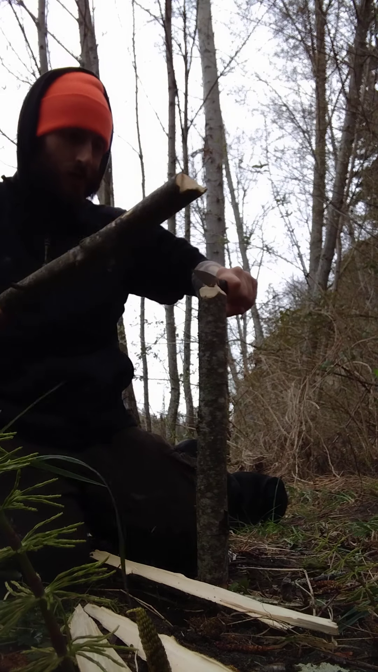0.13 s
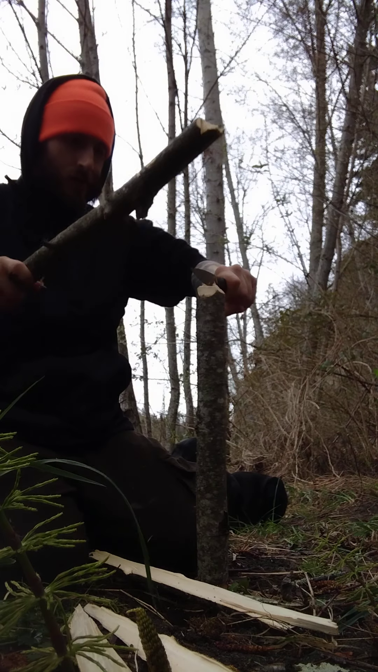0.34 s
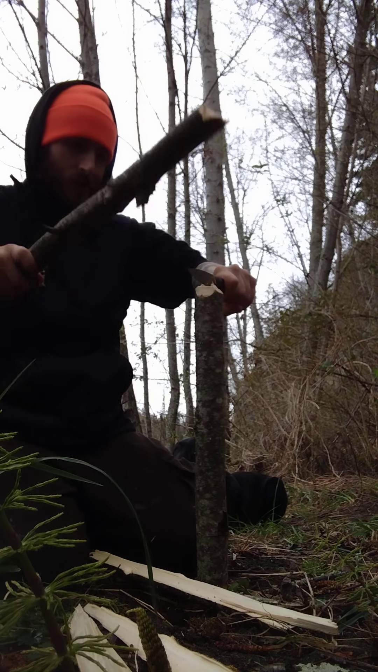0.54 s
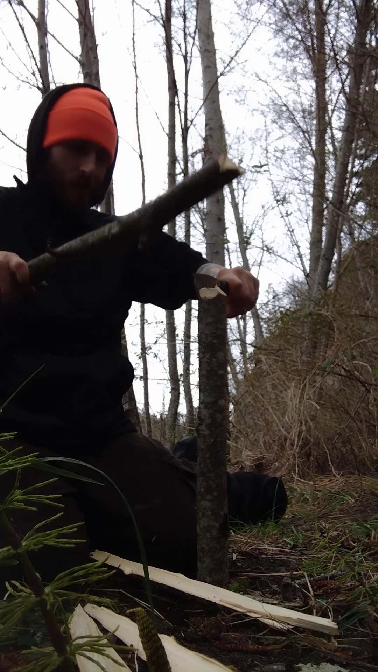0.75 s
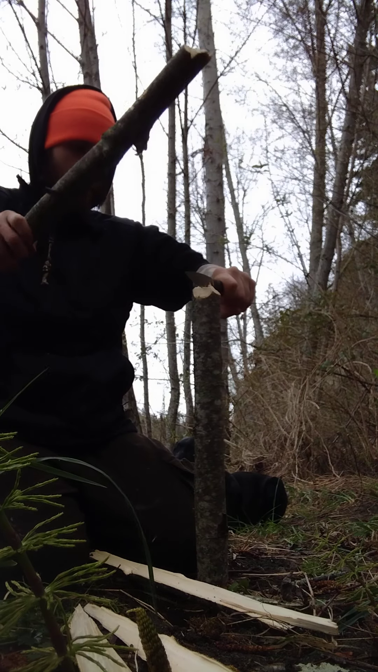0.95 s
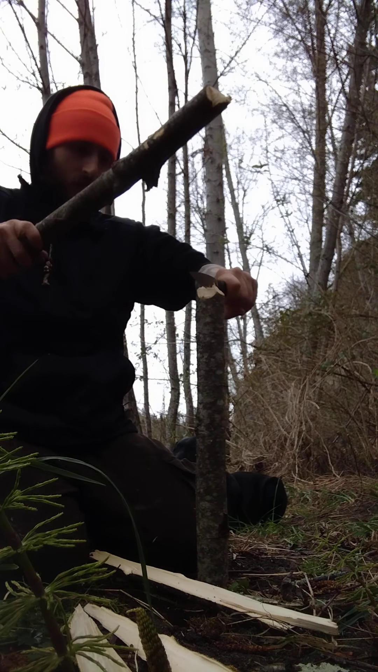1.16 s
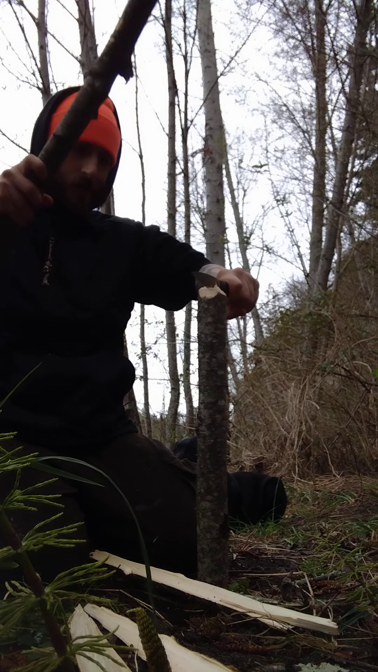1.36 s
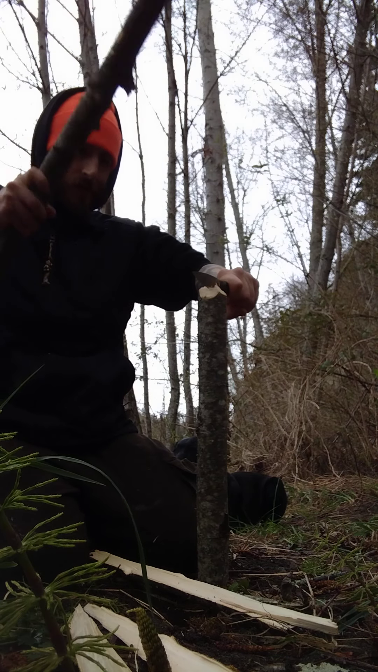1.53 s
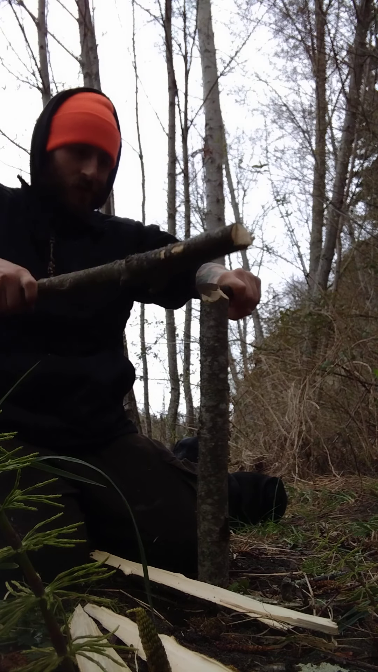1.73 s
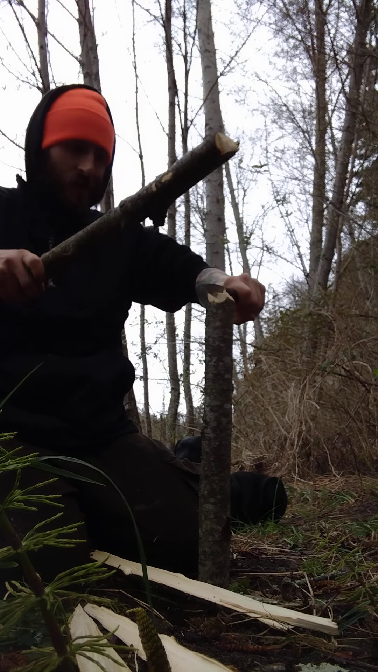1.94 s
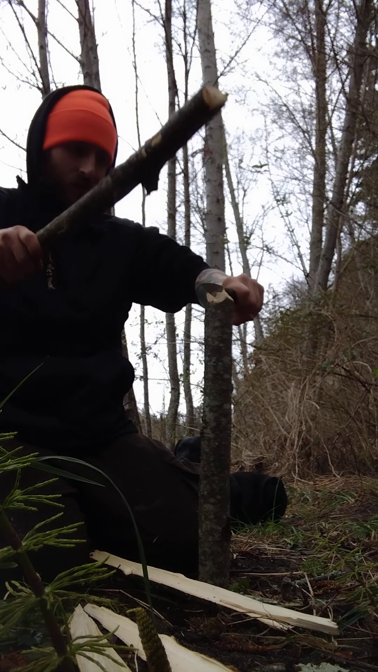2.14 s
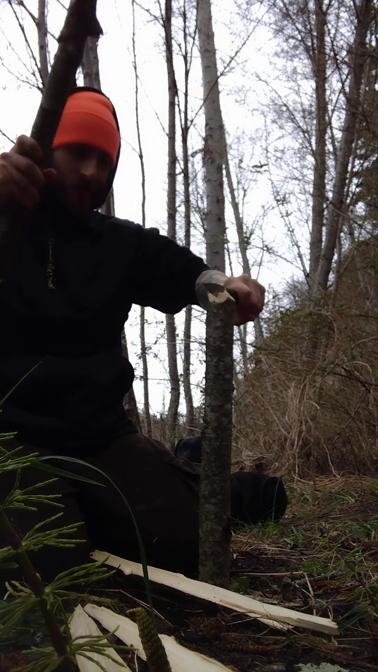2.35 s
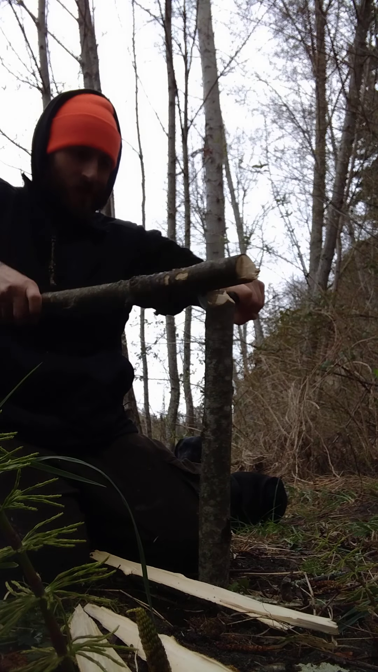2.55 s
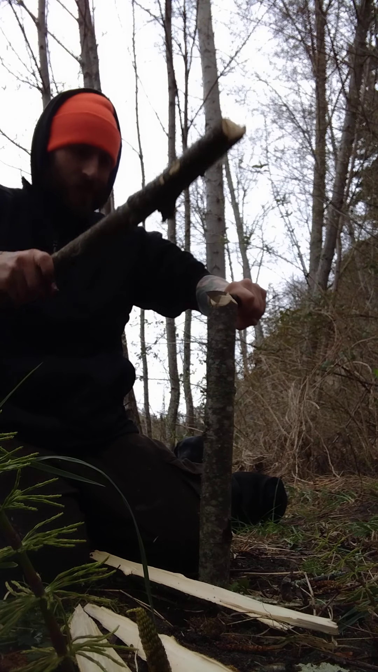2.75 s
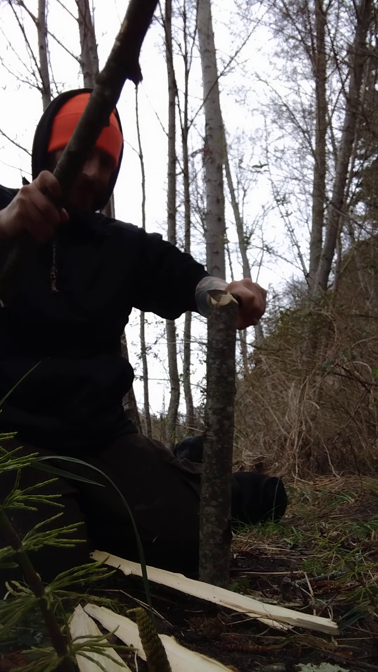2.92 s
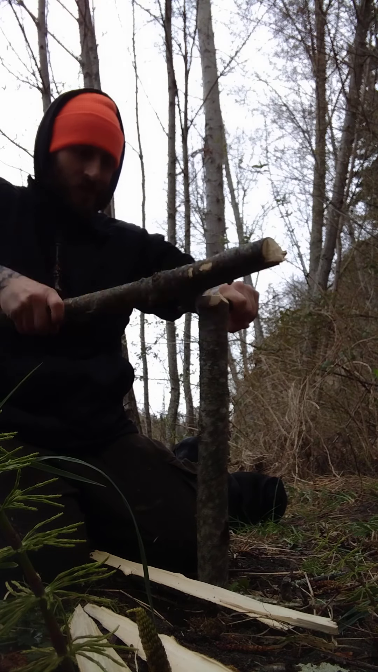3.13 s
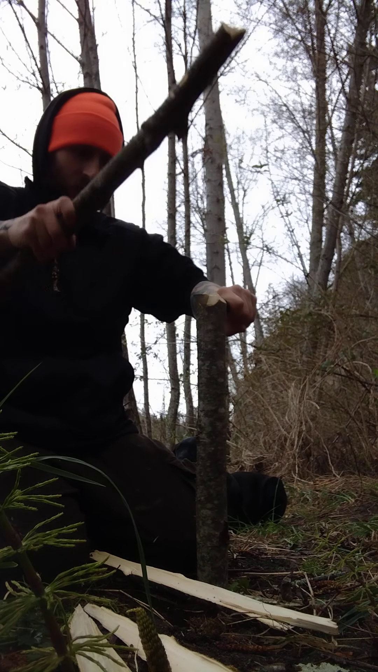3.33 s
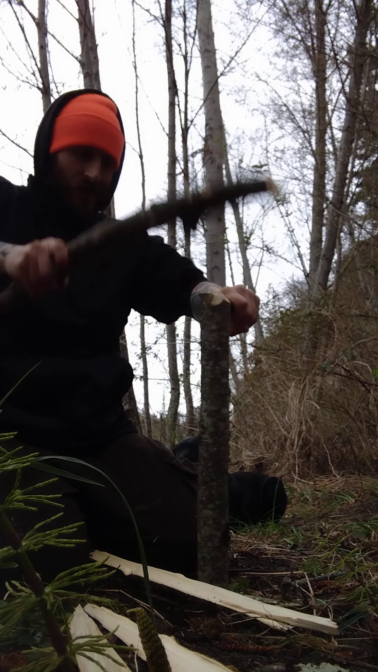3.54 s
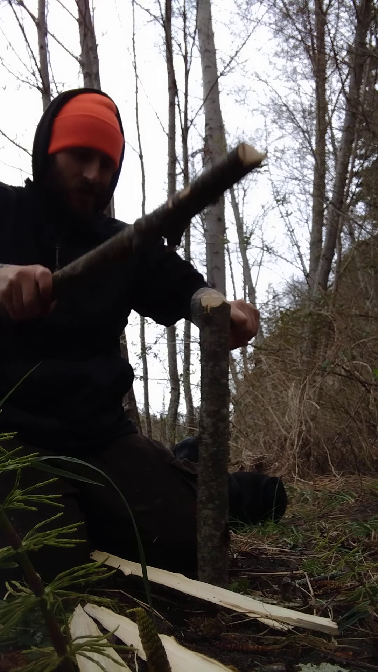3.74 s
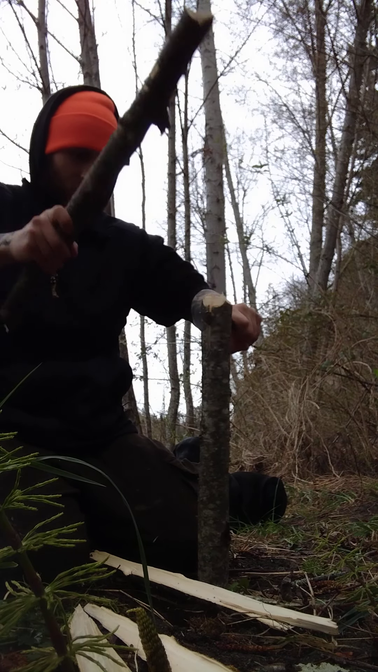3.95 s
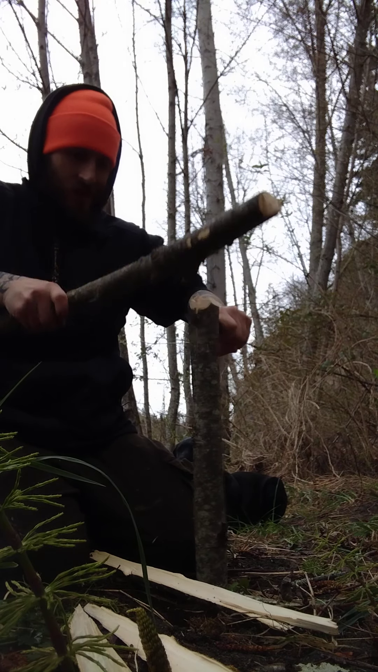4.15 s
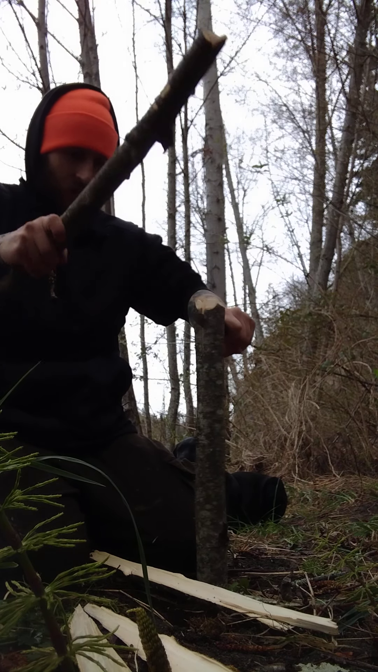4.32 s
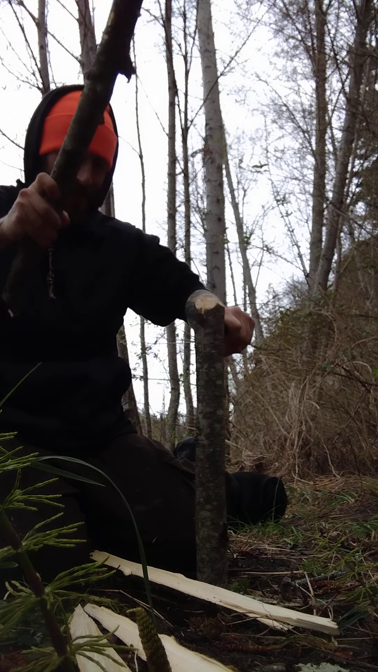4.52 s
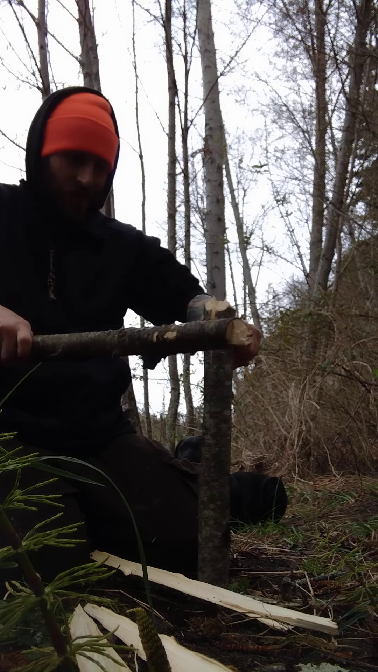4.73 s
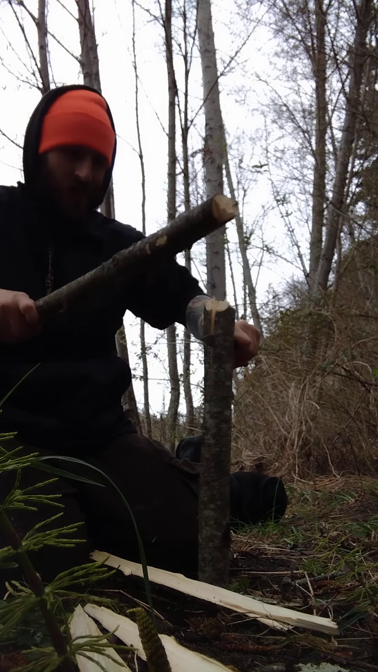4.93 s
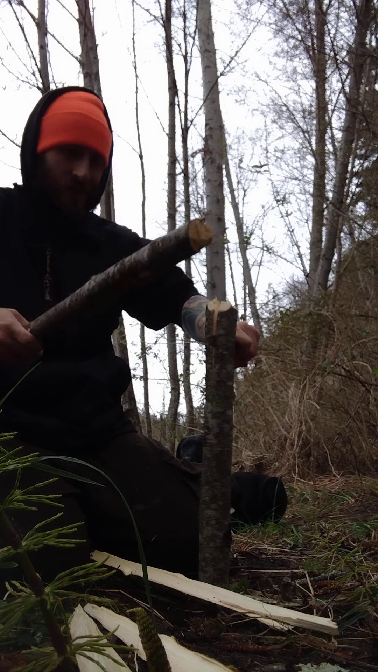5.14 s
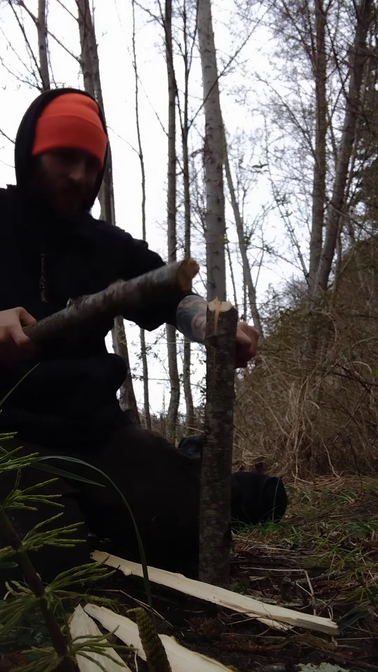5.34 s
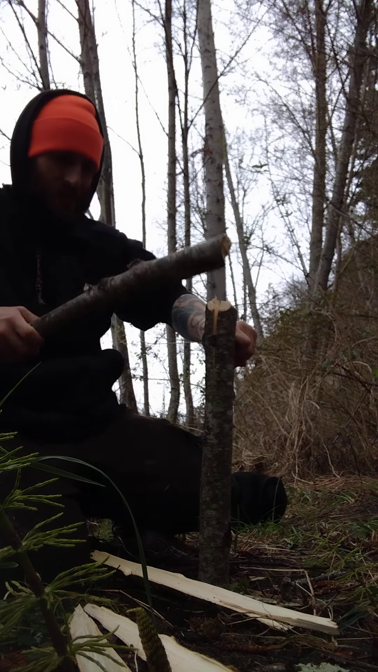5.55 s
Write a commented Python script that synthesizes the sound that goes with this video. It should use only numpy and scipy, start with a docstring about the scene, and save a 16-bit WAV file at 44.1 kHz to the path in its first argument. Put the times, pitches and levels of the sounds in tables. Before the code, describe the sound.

A low, dull rush of river water and wind runs steadily for about five and a half seconds, gently churning and much quieter than the blows. At 0.1 s a faint sleeve rustle and tiny tap are heard, and at 0.75 s another light woody tap. Then a wooden baton hits a knife blade wedged in an upright stick six times, at about 1.7, 2.6, 3.2, 3.7, 4.1 and 4.8 s. Each blow is very short and dry: a bright crack, a choked steel ring, a woody knock, a soft deep thud into soil and a crisp tearing of fibres. The second is sharpest and most metallic, with a small rebound click; the third is duller; the fifth is hollow, full and thumpy; the last tears longest. Small grip rustles surround some blows. Brief undergrowth reflections and a faint longer tree echo follow each. Close stereo microphone, open woodland. Only the rush and a barely audible rustle near 5.3 s remain.

```python
"""A steady rush of water and wind comes first, then a soft rustle and light taps, then six hard knocks.
A wooden baton strikes the spine of a knife set in an upright stick, in a wood beside a river.
Each blow rings the wedged blade, knocks the stick, thuds into the soil and tears a few fibres.
Dying sine waves make the rings and thuds, tiny random snaps make the cracks, tearing and rustles.
Fading noise makes the echoes of undergrowth and trees; noise shaped in pitch and time makes the rush."""
import sys
import numpy as np
from scipy import signal
from scipy.fft import rfft, irfft
from scipy.io import wavfile
from scipy.ndimage import uniform_filter1d

SR = 44100
rng = np.random.default_rng(int(sys.argv[2]) if len(sys.argv) > 2 else 0)


def digitize_waveform(pressure):
    """Quantize a signal to 16-bit integers and store it at the path in sys.argv[1].

    Rows of a 2-D input are taken as channels; values are limited to [-1, 1].
    """
    field = np.atleast_2d(pressure).T
    bounded = np.clip(field, -1, 1)
    quanta = np.round(bounded * 32767).astype(np.int16)
    wavfile.write(sys.argv[1], SR, quanta)


N = 246078  # length of the scene in samples
T = np.arange(int(.35 * SR)) / SR  # time within one struck sound, seconds

# Baton blows: start_s, crack_db, steel_db, stick_knock_db, hollow_clonk_db, soil_thud_db,
# blade_slide_s, tearing_db, main_bend_hz, main_bend_db, upper_bend_hz
BATON_BLOWS = [(1.7363, -17.5, -24.5, -18, -28, -36.5, 0.0059, -31, 2125, -20.5, 3490),
               (2.6486, -10, -18.5, -17.5, -51, -28, 0.0039, -26, 2290, -4, 2700),
               (3.2269, -28.5, -41, -16.5, -30, -36, .005, -22, 1970, -18.5, 2800),
               (3.6797, -20.5, -18, -23.5, -35, -39, 0.0092, -25.5, 2210, -21.5, 2740),
               (4.1384, -23, -31.5, -13, -10, -25.5, .0033, -37, 1660, -15.5, 2290),
               (4.7666, -16, -22.5, -22, -27, -41, .014, -26, 2060, -17.5, 3175)]
# Light touches and rebounds of baton and knife: start_s, tick_db, steel_db, stick_knock_db, # soil_thud_db,
# tone_hz, tone_db (a short swelling tone: a bend of the blade, but at 2.6093 s the stick's hollow clonk)
LIGHT_TAPS = [(.1345, -52, -39, -44, -74, 1310, -35), (0.75, -42, -40.5, -32, -50.5, 3600, -46.5),
              (2.6093, -59, -56.5, -54, -69.5, 330, -29.5), (2.6851, -21, -45, -42, -60, 1980, -22),
              (4.1818, -40.5, -42, -49.5, -71.5, 3020, -53)]
# Sleeve and grip rustles: start_s, length_s, level_db
CLOTH_RUSTLES = [(0.113, 0.15, -58.5), (2.587, 0.038, -55), (2.606, 0.01, -48.5), (3.189, 0.021, -49),
                 (4.111, 0.061, -49), (4.175, 0.066, -57), (5.292, 0.056, -62)]

# The next four tables hold ringing tones. A level is relative, since each strike adds its own.
# t60_s is the time to fall by 60 dB; left_lead_rad is how far the left side's phase is ahead.
# Steel blade: pitch_hz, level_db, t60_s, left_minus_right_db, left_lead_rad
BLADE_TONES = [(1317, -10.5, 0.056, -4, -2.1), (1760, -6.5, 0.027, -14, -2), (2018, 3, 0.028, -3, 0.2),
               (2500, 1.5, 0.031, -1, -3), (2766, -0.5, 0.025, -4.5, -0.66), (3280, -16, 0.022, 1, -4),
               (3520, -15, 0.045, 6, 2.8), (4036, -10.5, 0.02, 0, -0.5)]
# Wooden stick: pitch_hz, level_db, t60_s, left_minus_right_db, left_lead_rad
STICK_TONES = [(625, -5.5, 0.014, 9, 0.3), (747, -2.5, 0.025, 5, 0.14), (977, -3, 0.011, 2.5, -4),
               (1330, -8.5, 0.0267, -10, -2.2), (1530, -15, 0.0082, -2.5, -3)]
# Hollow clonk of the stick: pitch_hz, level_db, t60_s, left_minus_right_db, left_lead_rad
CLONK_TONES = [(172, -16, 0.011, 3.6, .1), (312, 1.5, 0.025, 3, 0.13), (398, 1.5, 0.022, 3, 0.25)]
# Soil, before each blow changes pitch and length: pitch_hz, level_db, t60_s, left_minus_right_db, left_lead_rad
SOIL_TONES = [(55, -6, 0.21, 3, .1), (107.5, 7.5, .14, 4.4, 0.12), (129.4, -3.5, 0.16, 2.6, .1),
              (200, 0.5, 0.095, 3, .1)]

# Tone colours; only the shape counts, as the loudness is set elsewhere.
# Wood snapping against steel: pitch_hz, relative_level_db
CRACK_COLOUR = [(40, -43), (300, -11), (1200, 2), (2200, -2.5), (3500, 2.5), (5200, -8), (7500, -4.5),
                (11000, -12.5), (15500, -5), (17000, -4.5)]
# Tearing wood fibres: pitch_hz, relative_level_db
TEAR_COLOUR = [(40, -44), (300, -9), (1200, -12.5), (2200, 4), (3300, -4.5), (4400, -14.5), (5400, -8.5),
               (7000, -11.5), (11000, -20), (15500, -11), (17000, -11)]
# Rubbing sleeve and grip: pitch_hz, relative_level_db
CLOTH_COLOUR = [(400, -9), (1200, 4.5), (2700, 12), (4500, -7), (8000, -4.5), (11000, -16.5), (15000, -1.5),
                (16500, -16)]
# Water and wind: pitch_hz, relative_level_db
RUSH_COLOUR = [(15, -68), (25, -49), (53, -33), (78, -13), (127, -8), (206, -5), (256, -4), (476, -2.5),
               (560, -1), (1190, -12), (1520, -18.5), (2480, -19.5), (3340, -30), (14800, -51.5),
               (16000, -45)]

# Slow swell of the rush, before RUSH_DB is added: time_s, level_db
RUSH_SWELL = [(0.0, -47), (0.28, -49), (3.26, -46.5), (3.42, -46.5), (5.24, -47.5), (5.58, -49.5)]
# Likeness of left and right in rush and echoes: pitch_hz, likeness (1 same, 0 unrelated, below 0 opposed)
SIDE_LIKENESS = [(60, 0.91), (130, 0.99), (290, 0.99), (640, 1), (1410, 0.34), (3100, 0.15), (6820, -0.087),
                 (15000, -0.25)]
# Left-right balance of the rush: pitch_hz, left_minus_right_db
RUSH_BALANCE = [(60, 2), (110, 1.0), (200, 0.5), (380, 1.5), (700, 2.5), (1290, -0.5), (2380, -4.5),
                (4400, -5), (8120, -3.5), (15000, -1.5)]
# How the two microphones hear the tiny snaps: pitch_hz, left_minus_right_db
SNAP_BALANCE = [(300, 6), (750, -14), (1350, -13), (2000, 9.5), (3400, -3), (5200, -3), (7500, -2),
                (9800, 10.5), (13000, -2.5), (16000, 2.5)]
# Short echoes from undergrowth: pitch_hz, level_db, t60_s
UNDERGROWTH_ECHO = [(250, -18, 0.13), (600, -15, 0.12), (1384, -14, .1), (2100, -21.5, 0.13),
                    (3440, -12, 0.12), (7000, -12.5, 0.13), (15000, -8.5, 0.1)]
# Long echoes from trees: pitch_hz, level_db, t60_s
TREE_ECHO = [(99.5, -36.5, .8), (513, -10, 1.5), (1300, -17, 1.1), (2100, -28, 1.5), (4000, -23.5, 1.5),
             (7000, -25, 0.76), (15000, -32.5, .55)]

RUSH_DB = 1
EDGE_HZ = 16100  # top of the whole sound
# Each bending tone peaks after this share of the blade's slide; UPPER_DB is the same in every blow
MAIN_SWELL_SHARE, UPPER_SWELL_SHARE, UPPER_DB = 0.15, 0.23, -26
# The blows pack the soil under the stick, so its pitch factor climbs
LOOSE_PITCH, PACKING_PER_BLOW = 0.95, 0.025
# Soil yields to a hard push: the thud lasts half as long for every HALVING_DB above SPRINGY_DB
SPRINGY_DB, HALVING_DB = -32.5, 11.5
TAP_SWELL_S, TAP_CONTACT_S = 0.0013, 0.0016
HALF_SIDES = np.array([[.5], [-.5]])  # shares a left-right difference between the two sides


def blows(bend_delay_s=.0008):
    """Baton on spine: the blade rings, the stick knocks, the soil thuds, and fibres tear until the blade sticks."""
    air, ground = np.zeros((2, 2, N))
    for number, blow in enumerate(BATON_BLOWS):
        start_s, crack_db, steel_db, knock_db, clonk_db, thud_db = blow[:6]
        slide_s, tear_db, main_hz, main_db, upper_hz = blow[6:]

        add(air, start_s - .0005, amp(crack_db) * crack(decay_s=.002))
        add(air, start_s, amp(steel_db) * ring(BLADE_TONES, rise_s=0.0017))
        main_bend = bend(main_hz, main_db, MAIN_SWELL_SHARE * slide_s)
        upper_bend = bend(upper_hz, UPPER_DB, UPPER_SWELL_SHARE * slide_s)
        add(air, start_s + bend_delay_s, main_bend + upper_bend)

        knock = amp(knock_db) * ring(STICK_TONES, rise_s=0.00087)
        clonk = amp(clonk_db) * ring(CLONK_TONES, rise_s=0.0011)
        # knock and clonk are kept free of deep bass
        add(air, start_s, low_cut(knock + clonk, hz=110))
        add(air, start_s, amp(tear_db) * tear(slide_s))

        pitch = LOOSE_PITCH + PACKING_PER_BLOW * number
        length = 2 ** ((SPRINGY_DB - thud_db) / HALVING_DB)
        add(ground, start_s, amp(thud_db) * thud(pitch, length))
    return air, ground


def crack(decay_s, rise_s=0.00025):
    """The bright snap of wood meeting steel: a burst of tiny snaps that starts fast and dies away."""
    envelope = (1 - np.exp(-T / rise_s)) * np.exp(-T / decay_s)
    snaps = grains(len(T), spread_db=7.0, shared=0.15)
    return colour(snaps * envelope, CRACK_COLOUR)


def ring(tones, rise_s, pitch=1, length=1):
    """Struck, dying tones that build up during the contact; each reaches the two microphones differently."""
    out = np.zeros((2, len(T)))
    for hz, db, t60_s, balance_db, lead_rad in tones:
        gain = amp(db + HALF_SIDES * balance_db)
        decay = np.exp(-np.log(1000) * T / (t60_s * length))
        wave = np.sin(2 * np.pi * hz * pitch * T + HALF_SIDES * lead_rad)
        out -= gain * decay * wave
    return out * (1 - np.exp(-(T / rise_s) ** 2))


def bend(hz, db, swell_s, lead_rad=-.25):
    """A short tone that swells and is choked at once: a bending tone of the blade as the baton presses, or in
    one tap the stick's hollow clonk."""
    envelope = T / swell_s * np.exp(1 - T / swell_s)  # reaches 1 at swell_s
    return amp(db) * envelope * np.sin(2 * np.pi * hz * T + HALF_SIDES * lead_rad)


def tear(slide_s):
    """Wood fibres snap while the blade slides; the tearing dies quickly once the slide ends."""
    sliding = (1 - np.exp(-T / 0.00075)) * np.exp(-np.maximum(T - slide_s, 0) / 0.0017)
    snaps = grains(len(T), spread_db=9.5, shared=0.42)
    return colour(snaps * sliding, TEAR_COLOUR)


def thud(pitch=1, length=1):
    """The stick's foot pushes into springy soil, which sounds a few deep, dying tones."""
    return low_cut(ring(SOIL_TONES, rise_s=0.0022, pitch=pitch, length=length), hz=40)


def grains(count, spread_db, shared):
    """Dense tiny snaps of uneven size, partly alike in both microphones."""
    size, common, left, right = rng.standard_normal((4, count))
    shared = np.clip(shared, 0, 1)
    sizes = amp(spread_db * np.clip(size, -2, 2))
    snaps = sizes * (np.sqrt(shared) * common + np.sqrt(1 - shared) * np.array([left, right]))
    balance = amp(HALF_SIDES * read(SNAP_BALANCE, np.fft.rfftfreq(count, 1 / SR)))
    return evened(irfft(rfft(snaps) * balance, count))


def handling():
    """The baton touches or rebounds on the blade as small strikes; sleeve and grip rustle by rubbing."""
    air, ground = np.zeros((2, 2, N))
    for start_s, tick_db, steel_db, knock_db, thud_db, tone_hz, tone_db in LIGHT_TAPS:
        steel = amp(steel_db) * ring(BLADE_TONES, rise_s=TAP_CONTACT_S)
        blade = steel + bend(tone_hz, tone_db, TAP_SWELL_S)
        add(air, start_s, amp(tick_db) * crack(decay_s=0.0025) + blade)
        add(air, start_s, amp(knock_db) * ring(STICK_TONES, rise_s=TAP_CONTACT_S))
        add(ground, start_s, amp(thud_db) * thud())
    for start_s, length_s, db in CLOTH_RUSTLES:
        add(air, start_s, amp(db) * rustle(int(length_s * SR)))
    return air, ground


def rustle(count):
    """Rubbing cloth and grip: tiny snaps that swell and fade once."""
    swell = np.sin(np.linspace(0, np.pi, count))
    return colour(grains(count, spread_db=4.0, shared=0.36) * swell, CLOTH_COLOUR)


def scatter(x, bands, delay_s, size=256):
    """Many faint reflections; each band dies at its own speed and the bass is alike on both sides."""
    hz, t, z = signal.stft(rng.standard_normal((2, SR)), SR, nperseg=size)
    same = np.clip(read(SIDE_LIKENESS, hz), 0, 1)[:, None]
    z[1] = same * z[0] + np.sqrt(1 - same ** 2) * z[1]
    rate = np.log(1000) / read(bands, hz, axis=2)[:, None]
    # the square root keeps a band's energy the same however long it lasts
    z *= amp(read(bands, hz))[:, None] * np.exp(-rate * t) * np.sqrt(2 * rate / SR)
    tail = signal.istft(z, SR, nperseg=size)[1]
    tail_s = np.arange(tail.shape[1]) / SR
    tail *= 1 - np.exp(-(tail_s / delay_s) ** 2)  # the echoes build up gradually
    return signal.fftconvolve(x, tail, axes=1)[:, :N]


def river(patchy_db=0.65, flicker_db=1.25, size=2048):
    """Rushing water and wind in the trees: a dull wash that churns in patches and swells slowly."""
    hop = size // 4
    frames, hz = N // hop + 5, np.fft.rfftfreq(size, 1 / SR)
    a, b, c, d, patches = rng.standard_normal((5, frames, len(hz)))
    # patches change in time and pitch; the flicker moves all pitches together
    patches = uniform_filter1d(patches, size=7, axis=0)
    patches = evened(uniform_filter1d(patches, size=18, axis=1))
    flicker = evened(uniform_filter1d(rng.standard_normal(frames), size=5))[:, None]

    same = np.clip(read(SIDE_LIKENESS, hz), -1, 1)
    left = a + 1j * b
    right = same * left + np.sqrt(1 - same ** 2) * (c + 1j * d)
    z = np.array([left, right])
    z *= amp(read(RUSH_COLOUR, hz) + patchy_db * patches + flicker_db * flicker)
    z *= amp(HALF_SIDES[:, :, None] * read(RUSH_BALANCE, hz))
    wash = signal.istft(z.transpose(0, 2, 1), nperseg=size, noverlap=size - hop)[1][:, :N]
    swell_db = np.interp(np.arange(N) / SR, *np.transpose(RUSH_SWELL))
    return evened(wash) * amp(RUSH_DB + swell_db)


def amp(db):
    """Turns decibels into a gain."""
    return 10 ** (np.asarray(db) / 20)


def evened(x):
    """Scales to an rms (average strength) of 1."""
    return x / np.sqrt(np.mean(x ** 2) + 1e-20)


def read(points, hz, axis=1):
    """Reads a table column between its points, on a log-frequency axis."""
    table = np.transpose(points)
    return np.interp(np.log(hz + 1), np.log(table[0] + 1), table[axis])


def add(mix, start_s, sound):
    """Mixes a stereo sound in at its start time."""
    part = mix[:, round(start_s * SR):][:, :sound.shape[1]]
    part += sound[:, :part.shape[1]]


def colour(x, spectrum, size=1024):
    """Filters with the given spectrum; the filter has unit energy and never sounds ahead of its input."""
    log_gain = np.log(amp(read(spectrum, abs(np.fft.fftfreq(size, 1 / SR)))))
    # the Hilbert transform gives the phase that packs the energy at the start
    response = np.exp(np.conj(signal.hilbert(log_gain)))
    taps = np.fft.ifft(response).real[:size // 2]
    return signal.fftconvolve(x, taps[None] / np.linalg.norm(taps), axes=1)[:, :x.shape[1]]


def low_cut(x, hz):
    """Weakens everything below hz with a second-order high-pass."""
    return signal.sosfilt(signal.butter(2, hz, "highpass", fs=SR, output="sos"), x)


def scene():
    """The work close by, its echoes from undergrowth and trees, and the river behind."""
    air, ground = np.add(blows(), handling())
    echoes = scatter(air, UNDERGROWTH_ECHO, delay_s=0.0052) + scatter(air, TREE_ECHO, delay_s=0.028)
    # the thuds travel through the soil to the microphone and raise no echo
    return air + echoes + ground + river()


def record(dry):
    """Cuts peaks at full scale, then removes the pitches above EDGE_HZ."""
    lowpass = signal.firwin(255, EDGE_HZ, window=("kaiser", 8), fs=SR)
    return signal.oaconvolve(np.clip(dry, -1, 1), lowpass[None], "same")


dry = scene()
out = record(dry)
digitize_waveform(out)
```